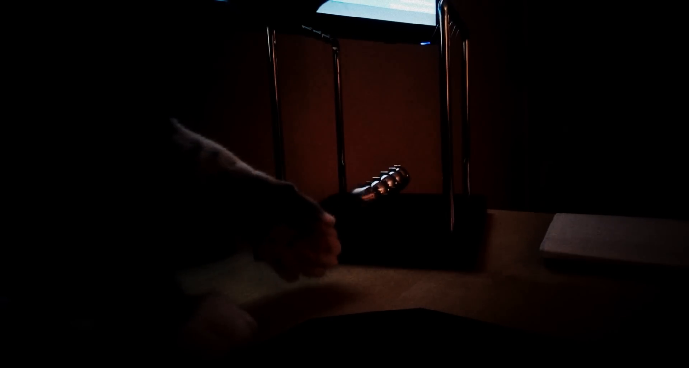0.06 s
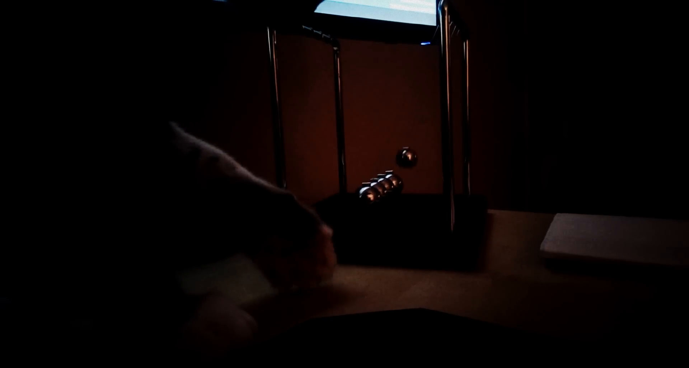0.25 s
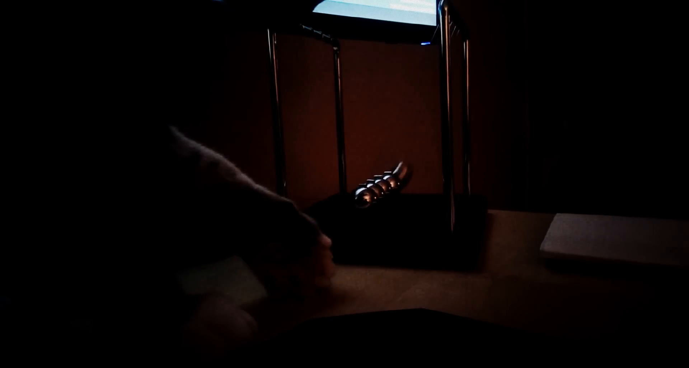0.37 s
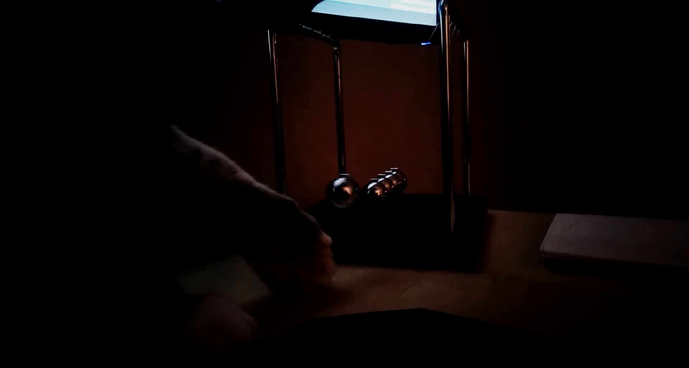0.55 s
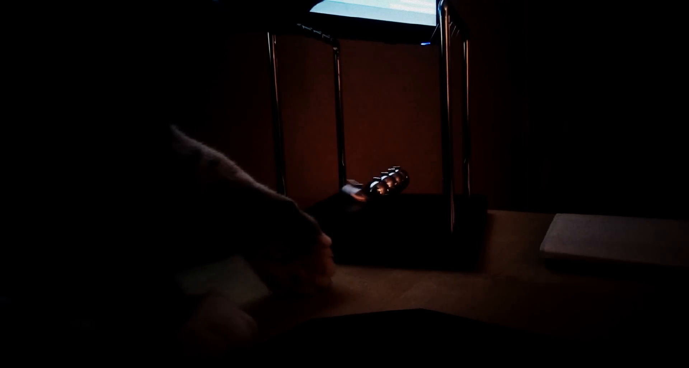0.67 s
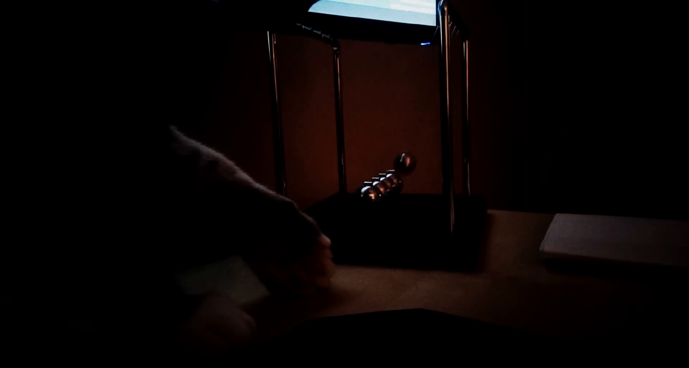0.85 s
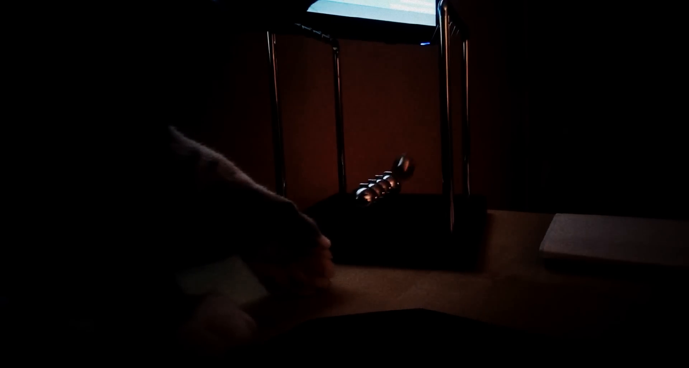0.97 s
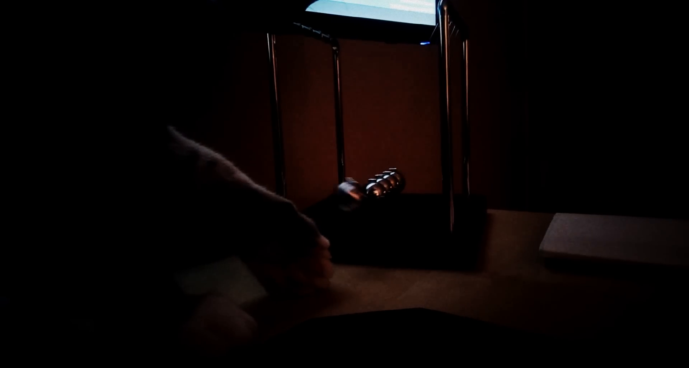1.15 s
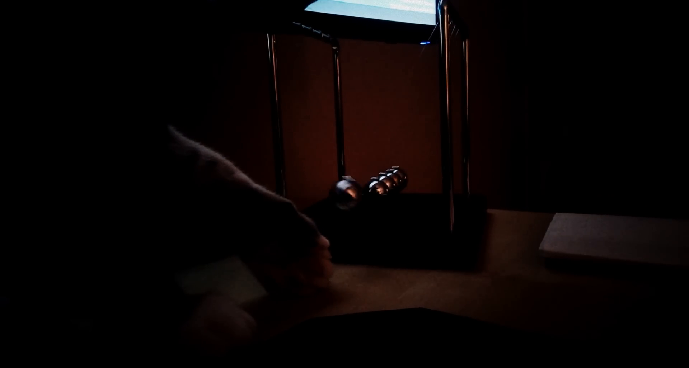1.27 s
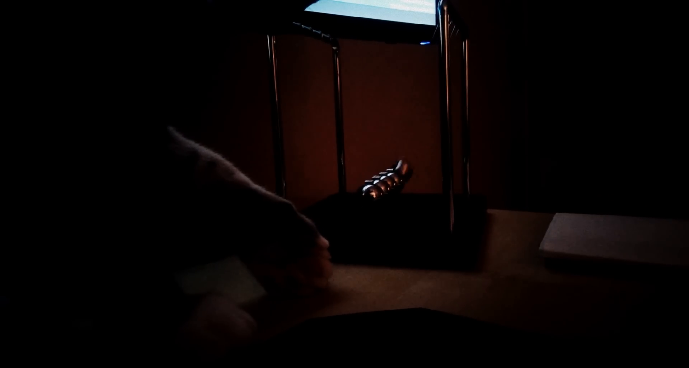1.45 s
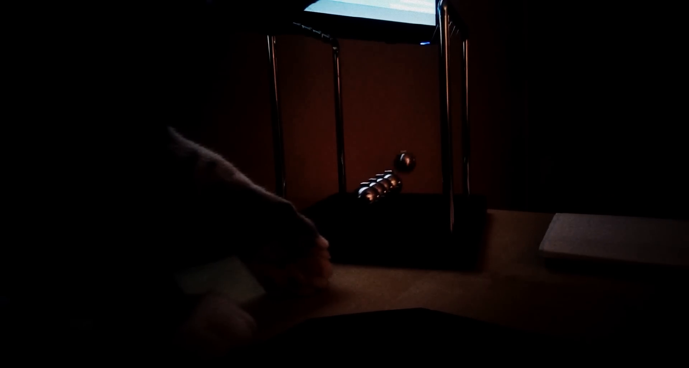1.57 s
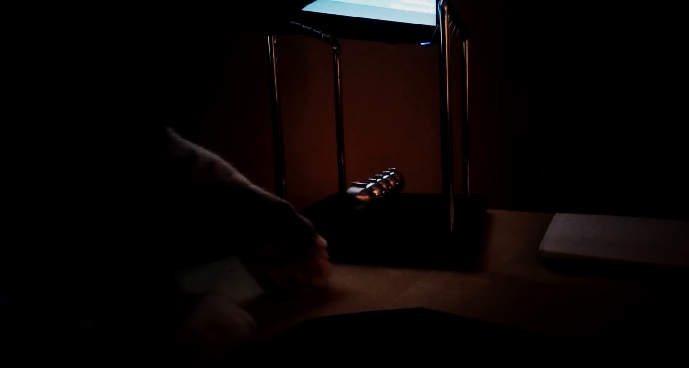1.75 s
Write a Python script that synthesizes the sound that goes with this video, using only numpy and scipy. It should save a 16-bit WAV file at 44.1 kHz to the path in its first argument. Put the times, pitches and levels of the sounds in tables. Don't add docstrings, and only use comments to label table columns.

```python
import sys
import numpy as np
from scipy import signal
from scipy.fft import rfft, irfft
from scipy.io import wavfile
from scipy.ndimage import uniform_filter1d

SR = 44100
rng = np.random.default_rng(int(sys.argv[2]) if len(sys.argv) > 2 else 0)


def pcm_store(signal):
    levels = np.round(np.clip(np.atleast_2d(signal), -1, 1) * 32767)
    wavfile.write(sys.argv[1], SR, levels.astype(np.int16).T)


def elevation(decibels):
    levels = np.asarray(decibels, float)
    return 10 ** (levels / 20)


N = 79380

# pitch_hz [Hz], level_db [dB per Hz]
AIR_SPECTRUM = [(15, -44), (25, -19), (227, -7.5), (469, -13), (567, -13), (684, -14.5), (970, -16),
                (1450, -19.5), (15500, -37)]
# pitch_hz [Hz], coherence [-1 to 1]
AIR_COHERENCE = [(60, 0.15), (180, 0.71), (550, 0.71), (1650, -0.44), (4970, 0.15), (15000, -0.05)]
# pitch_hz [Hz], level_db [dB]
AIR_BALANCE = [(60, 1.5), (240, 2), (950, 2.5), (3770, 4), (15000, 4.5)]
# pitch_hz [Hz], width_hz [Hz], level_db [dB rms]
HUM_BANDS = [(58.8, 9.6, -67), (129.6, 14, -73), (216.6, 4.5, -69), (311.7, 4.1, -71.5), (499, 7.1, -79),
             (793.5, 5.3, -79)]
AIR_DB, SWELL_DB = -61, 2

# pitch_hz [Hz], t60_s [s]
REVERB_T60 = [(1000, 0.52), (3000, 0.59), (7000, 0.39), (11000, 0.32), (16000, .3)]
# pitch_hz [Hz], level_db [dB]
REVERB_LEFT = [(1000, 12), (2200, 0), (3600, 6.5), (6000, 2), (8500, -8.5), (10200, -8), (13500, -12.5),
               (16500, -28)]
# pitch_hz [Hz], level_db [dB]
REVERB_RIGHT = [(1000, 7), (2200, -1), (3600, -3), (7000, 0.5), (8800, -0.5), (10200, -12.5), (13500, -1.5),
                (16500, -15)]
# left_db [dB], right_db [dB]
CLUTTER_DB = (-18, -20)
CLUTTER_T60_S = 0.014
TAIL_START_S, TAIL_RISE_S, TAIL_DB = 0.0063, 0.0036, -11.5
EARLY_DB, EARLY_T60_S = -2.5, 0.033
LUMPY_DB = 7.5
ROOM_EDGE_HZ = 15800

# start_s [s] of the strike, then gap_ms [ms after it] of three follow-up contacts
SWING_TIMES = [(.21499, 14.55, 16.06, 16.33), (.54152, 14.64, 14.99, 15.55), (.86936, 12.61, 12.75, 15.14),
               (1.19595, 11.03, 11.40, 11.94), (1.52354, 8.82, 9.28, 9.61)]
# strike_db, second_db, third_db, fourth_db [dB]
SWING_FORCES = [(.5, -.6, -1, -.4), (0, -.3, -1.3, -2.8), (-.4, -3, -1.5, -3.1), (-.8, -.2, -.1, -1.2),
                (-1.1, -1.4, -1.2, -2.5)]
# start_s [s], level_db [dB]
LOOSE_TICKS = [(.0463, -17), (0.064, -20), (0.1016, -18.5), (.3682, -18.5), (0.3718, -19), (.4042, -19.5),
               (0.687, -17), (0.6868, -32), (0.7104, -19), (.8090, -38), (0.8198, -32.5), (0.9982, -21),
               (1.0014, -21.5), (1.017, -21.5), (1.0848, -35), (1.31, -19.5), (1.3142, -21.5),
               (1.3218, -23.5), (1.6106, -24.5), (1.6121, -22.5), (1.6195, -24)]
# delay_ms [ms], level_db [dB], shading_hz [Hz]
NEAR_PORT_PATHS = [(.023, 6.4, 12800), (.17, -4.4, 37000), (.42, -18, 40000)]
# delay_ms [ms], level_db [dB], shading_hz [Hz]
FAR_PORT_PATHS = [(.068, -13, 40000), (.092, -.5, 6000), (.378, -3.5, 6300), (.427, -13.5, 13400),
                  (.563, -3.7, 8000), (1.174, -4.1, 5800), (1.87, -9, 7000)]
# pitch_hz [Hz], width_hz [Hz], level_db [dB]
NEAR_RESONANCES = [(3800, 1350, -2.8), (6100, 1400, -13), (14350, 500, 3)]
# pitch_hz [Hz], width_hz [Hz], level_db [dB]
FAR_RESONANCES = [(3800, 800, 5), (5200, 400, 4.5), (13400, 1600, 4)]
# delay_ms [ms], left_db [dB], right_db [dB]
WALL_ECHOES = [(9.5, -33, -31), (15, -28, -30), (21, -34, -32), (27, -28, -23), (38, -34, -33)]
WANDER_MS, WANDER_DB = .005, 1
CONTACT_HZ, LOW_CUT_HZ = 17500, 2300
SOFTEN = .15
CLACK_DB, FAR_DB = -2.5, -.5
BEFORE_S, BEFORE_DB = .11, 4.5
EDGE_HZ = 16400


def read(points, hz):
    f, value = np.transpose(points)
    return np.interp(np.log(hz + 1), np.log(f + 1), value)


def evened(x):
    return x / np.sqrt(np.mean(x ** 2) + 1e-20)


def add(mix, at, sound):
    part = mix[:, at:at + sound.shape[1]]
    part += sound[:, :part.shape[1]]


def hum(centre_hz, width_hz, level_db):
    hz = np.fft.rfftfreq(N, 1 / SR)
    drift = rfft(rng.standard_normal(N)) * (hz > 0) / (1 + (hz / 3) ** 4)
    swell = evened(irfft(drift, N))
    band = rfft(rng.standard_normal(N)) / (1 + ((hz - centre_hz) / width_hz) ** 2)
    return elevation(level_db + SWELL_DB * swell) * evened(irfft(band, N))


def air():
    frames, hz = N // 512 + 5, np.fft.rfftfreq(2048, 1 / SR)
    a, b, c, d, patches = rng.standard_normal((frames, 1025, 5)).T
    patches = uniform_filter1d(patches, size=12, axis=0)
    patches = evened(uniform_filter1d(patches, size=8, axis=1))
    same = np.clip(read(AIR_COHERENCE, hz), -1, 1)[:, None]
    left = a + 1j * b
    right = same * left + np.sqrt(1 - same ** 2) * (c + 1j * d)
    lean = read(AIR_BALANCE, hz)[:, None] / 2
    level_db = read(AIR_SPECTRUM, hz)[:, None] + 1.1 * patches
    level_db = level_db - 40 * (hz > ROOM_EDGE_HZ)[:, None]
    z = np.array([left, right]) * elevation(level_db) * elevation(np.array([lean, -lean]))
    noise = signal.istft(z, nperseg=2048, noverlap=1536)[1][:, :N]
    return elevation(AIR_DB) * evened(noise) + sum(hum(*band) for band in HUM_BANDS)


def room():
    t = np.arange(SR) / SR
    hz, frames, z = signal.stft(rng.standard_normal((2, SR)), SR, nperseg=256)
    colour_db = np.array([read(REVERB_LEFT, hz), read(REVERB_RIGHT, hz)])[:, :, None]
    colour = elevation(colour_db) * (hz < ROOM_EDGE_HZ)[:, None]
    late = elevation(-60 * frames / read(REVERB_T60, hz)[:, None])
    early = elevation(EARLY_DB - 60 * frames / EARLY_T60_S)
    tail = signal.istft(z * (late + early) * colour, SR, nperseg=256)[1][:, :SR]
    tail = tail * np.clip((t - TAIL_START_S) / TAIL_RISE_S, 0, 1) * elevation(TAIL_DB - 28)
    lumps = evened(uniform_filter1d(rng.standard_normal(SR), size=60))
    tail = tail * elevation(LUMPY_DB * lumps * np.exp(-t / 0.02))
    clutter = signal.istft(z * colour, SR, nperseg=256)[1][:, :SR]
    fall_db = np.array(CLUTTER_DB)[:, None] - 60 * t / CLUTTER_T60_S
    return tail + clutter * elevation(fall_db) * (t > .0005)


def port_response(hz, paths, resonances, luck, trim_db):
    way = 0
    for k, (ms, db, shade_hz) in enumerate(paths):
        loose = k > 0
        level = elevation(db + trim_db + WANDER_DB * luck[k + len(paths)] * loose)
        delay_s = (ms + WANDER_MS * luck[k] * loose) / 1000
        way = way + level * np.exp(-2j * np.pi * hz * delay_s - (hz / shade_hz) ** 2)
    ring = sum(elevation(db) * 1j * hz * w / (f * f - hz * hz + 1j * hz * w) for f, w, db in resonances)
    return way * (1 + ring)


def clack(s, force_db, chance, spot, size=1024):
    hz, at = np.fft.rfftfreq(size, 1 / SR), int(s * SR) - 64
    u = hz / (CONTACT_HZ * elevation(SOFTEN * force_db))
    v = 1j * hz / LOW_CUT_HZ
    low_cut = v * v / (1 + 1.4 * v + v * v)
    pulse = 4j * u * np.exp(-u ** 2) * low_cut * elevation(CLACK_DB + force_db)
    pulse = pulse * np.exp(-2j * np.pi * hz * (s - at / SR - .00004))
    far = port_response(hz, FAR_PORT_PATHS, FAR_RESONANCES, chance[0], FAR_DB)
    near = port_response(hz, NEAR_PORT_PATHS, NEAR_RESONANCES, chance[1], 0)
    spots = [np.full(len(hz), k == spot) for k in range(3)]
    return at, irfft(pulse * np.array([far, near] + spots), size)


def cradle():
    hits = []
    for (s, *gaps), forces in zip(SWING_TIMES, SWING_FORCES):
        hits += [(s + ms / 1000, db) for ms, db in zip([0] + gaps, forces)]
    before = [(-BEFORE_S, BEFORE_DB), (.012 - BEFORE_S, BEFORE_DB)]
    chance = rng.standard_normal((60, 2, 16))
    mix = np.zeros((5, N + SR))
    for k, (s, db) in enumerate(hits + LOOSE_TICKS + before):
        add(mix, *clack(s + 1, db, chance[k], k % 3))
    direct = mix[:2]
    both = mix[[1, 0]] + direct
    echoes = sum(elevation([[left], [right]]) * np.roll(both, round(ms * SR / 1000), 1)
                 for ms, left, right in WALL_ECHOES)
    wet = sum(signal.fftconvolve(bare[None], room(), axes=1)[:, :N + SR] for bare in mix[2:])
    edge = signal.firwin(511, ROOM_EDGE_HZ, window=("kaiser", 8), fs=SR)[None]
    return (direct + signal.oaconvolve(.5 * echoes + wet, edge, "same"))[:, SR:]


def scene():
    return cradle() + air()


def top_cut(x):
    return signal.sosfilt(signal.butter(12, 16970, fs=SR, output="sos"), x)


def record(dry):
    low_pass = signal.firwin(255, EDGE_HZ, window=("kaiser", 8), fs=SR)[None]
    band = signal.oaconvolve(dry, low_pass, "same")
    return top_cut(band)


dry = scene()
out = record(dry)
pcm_store(out)
```